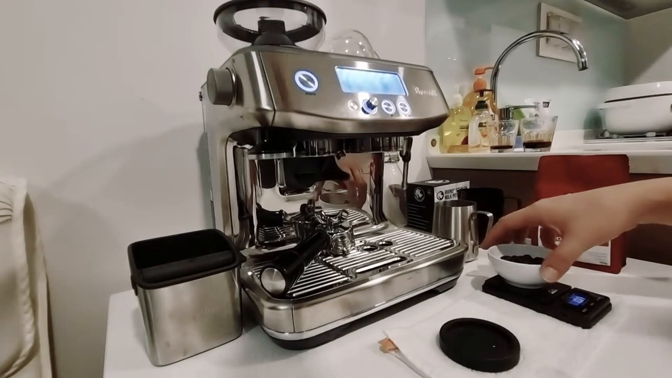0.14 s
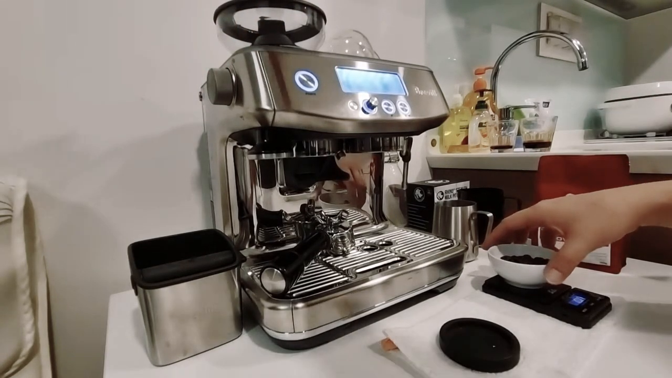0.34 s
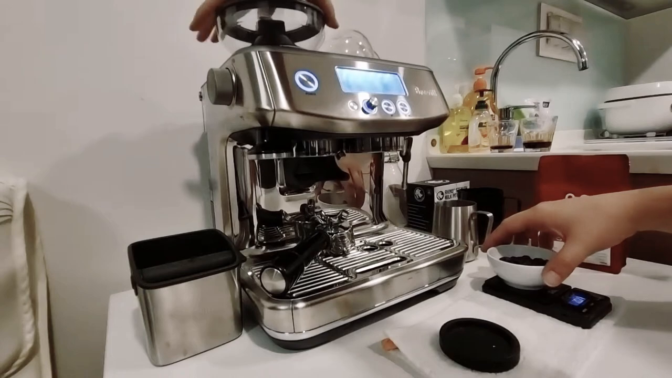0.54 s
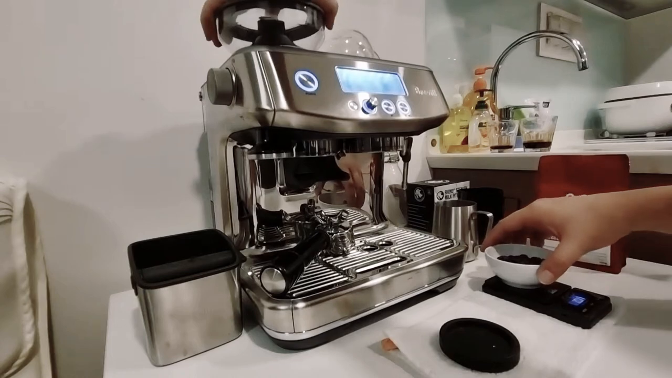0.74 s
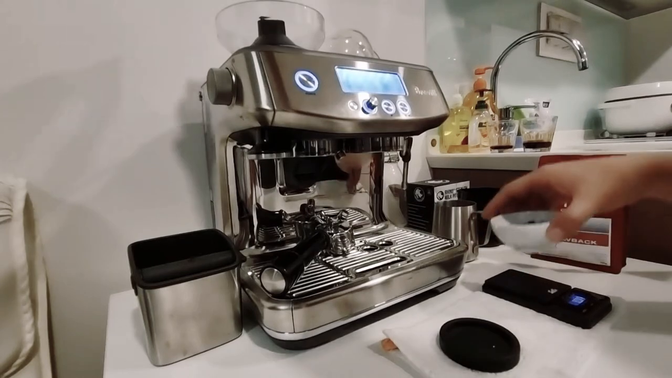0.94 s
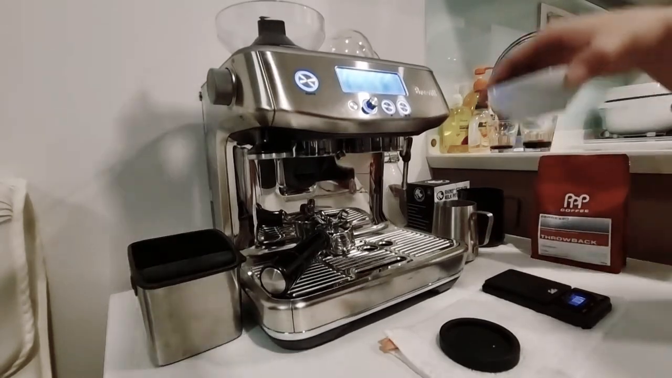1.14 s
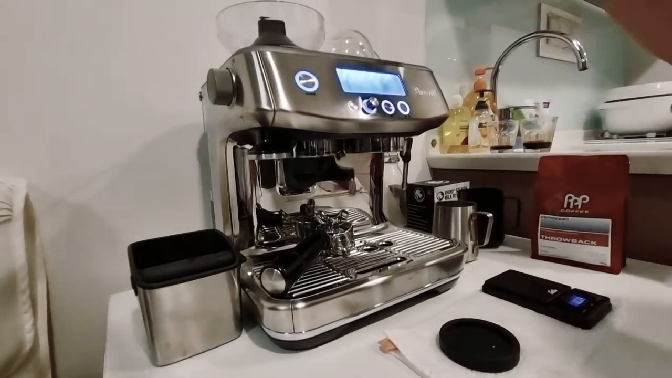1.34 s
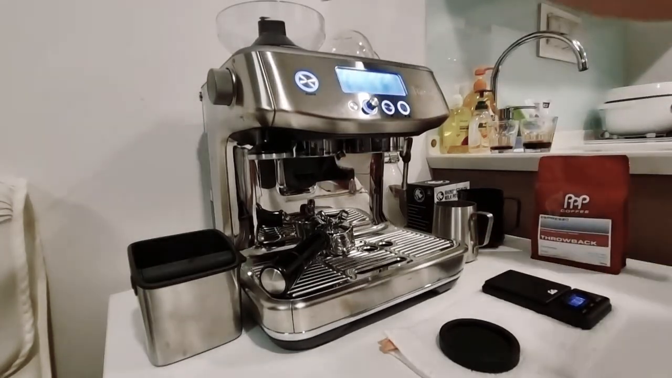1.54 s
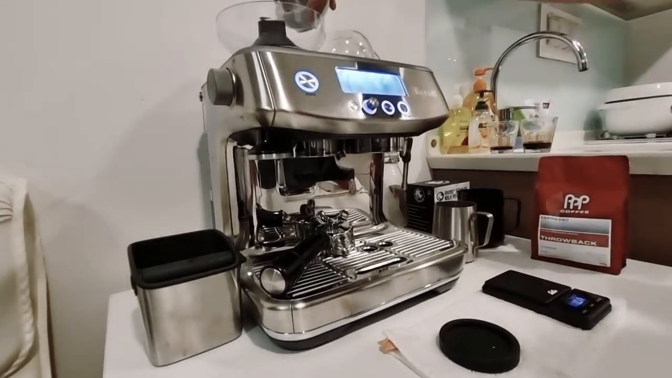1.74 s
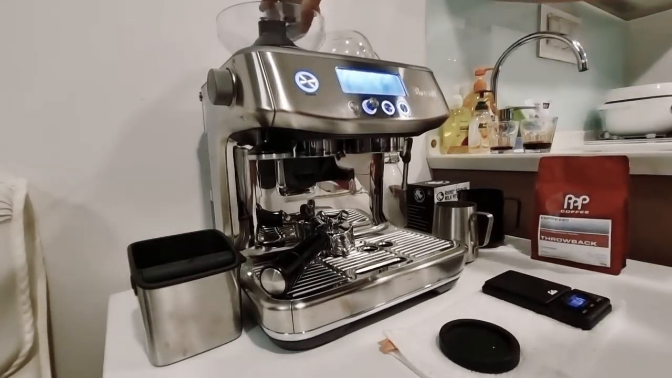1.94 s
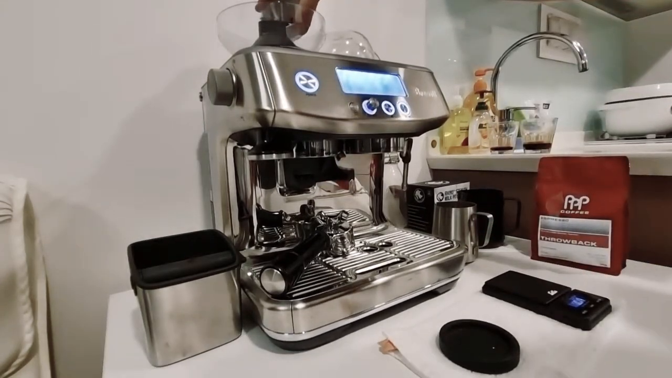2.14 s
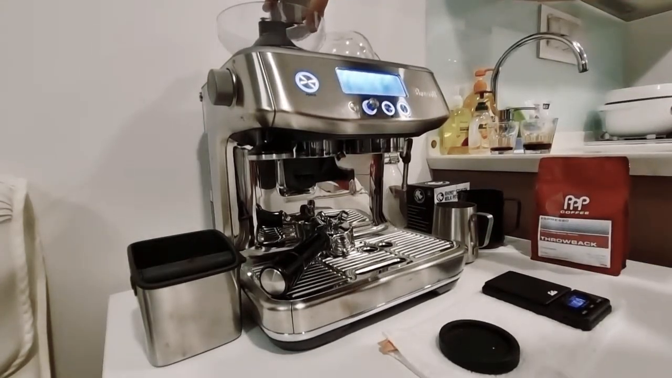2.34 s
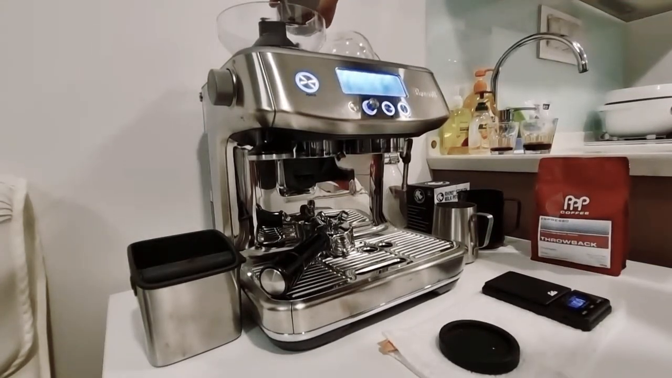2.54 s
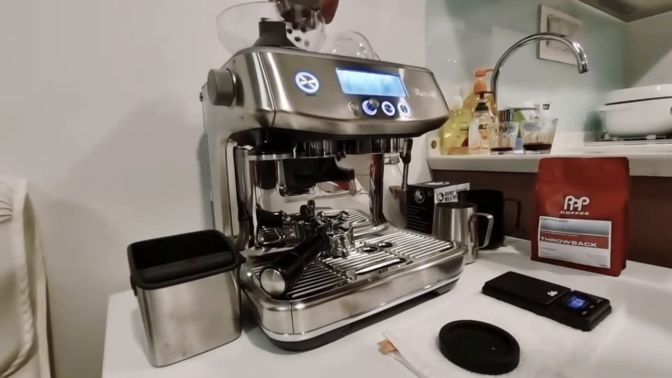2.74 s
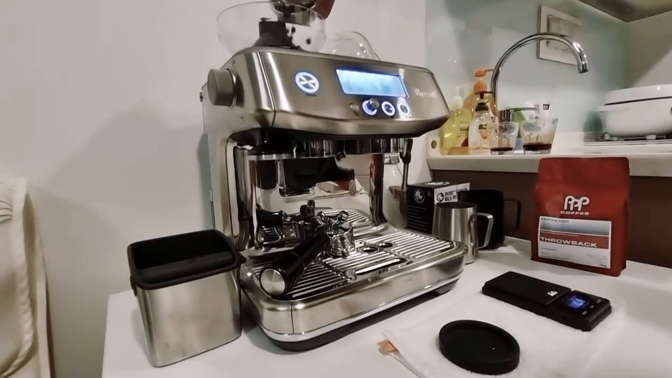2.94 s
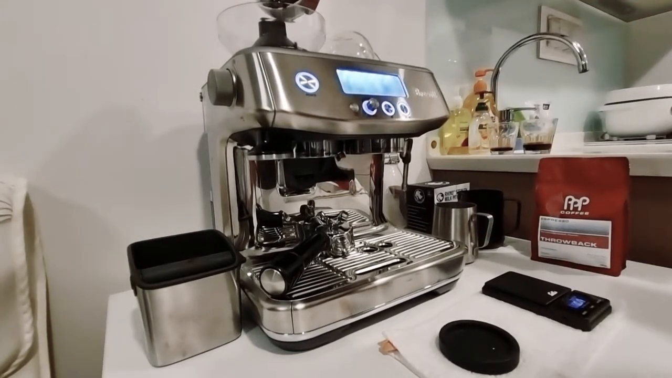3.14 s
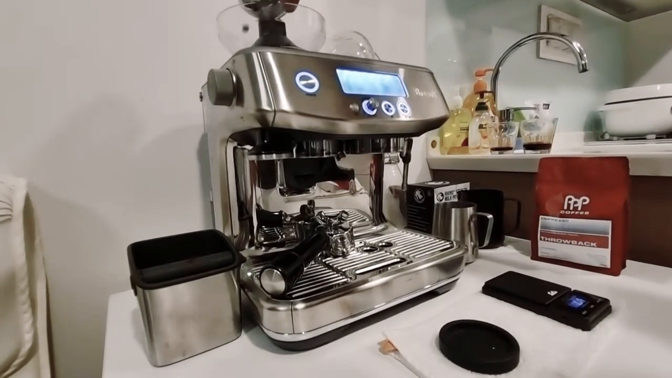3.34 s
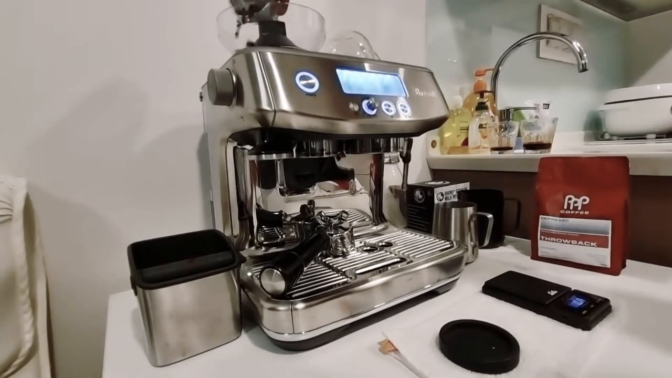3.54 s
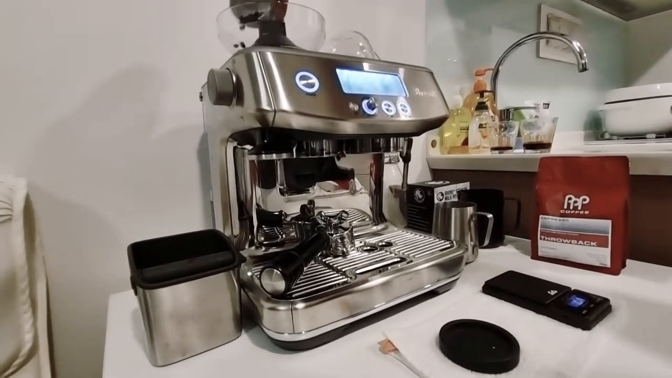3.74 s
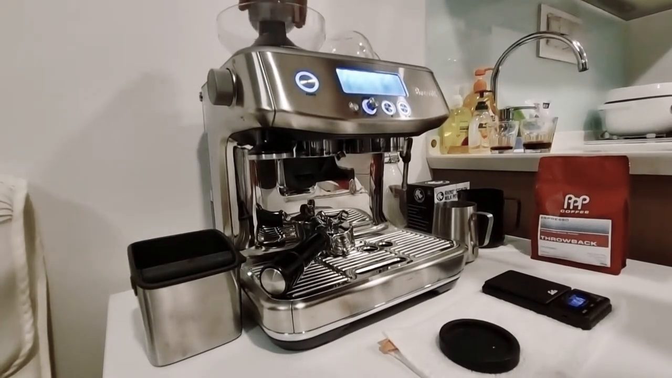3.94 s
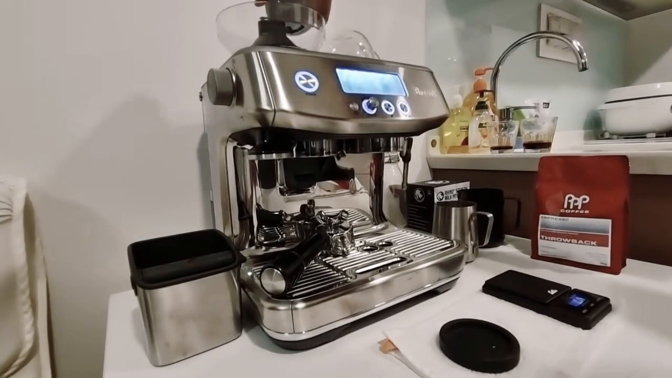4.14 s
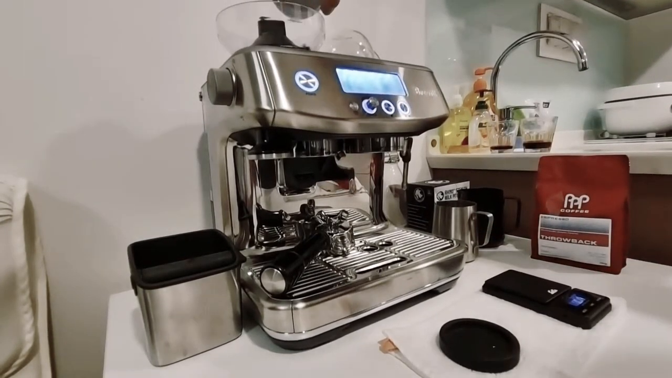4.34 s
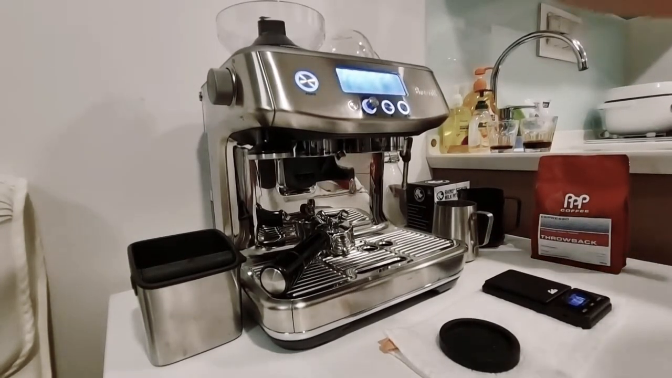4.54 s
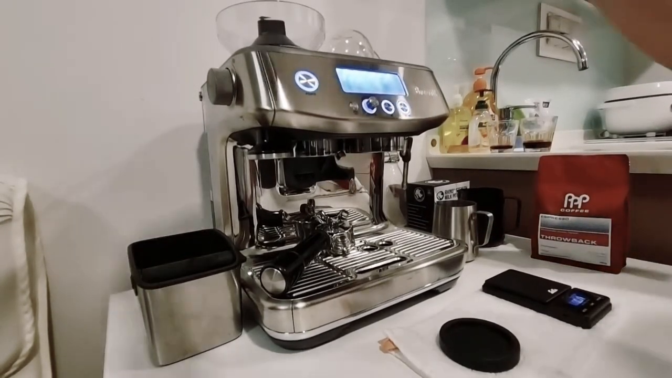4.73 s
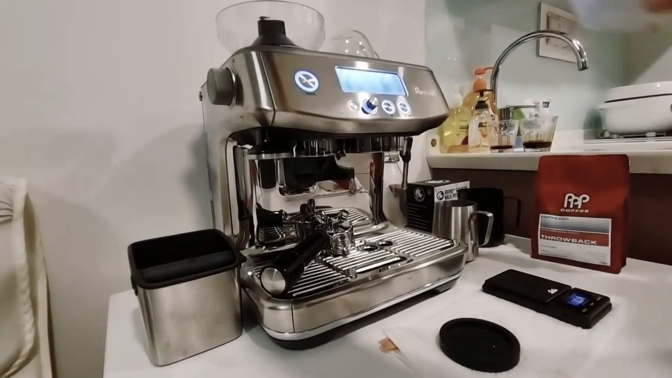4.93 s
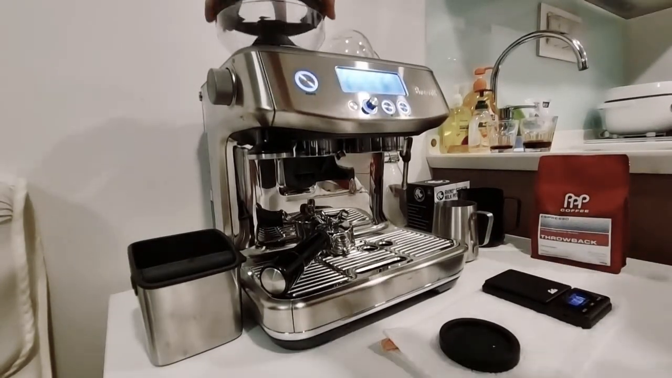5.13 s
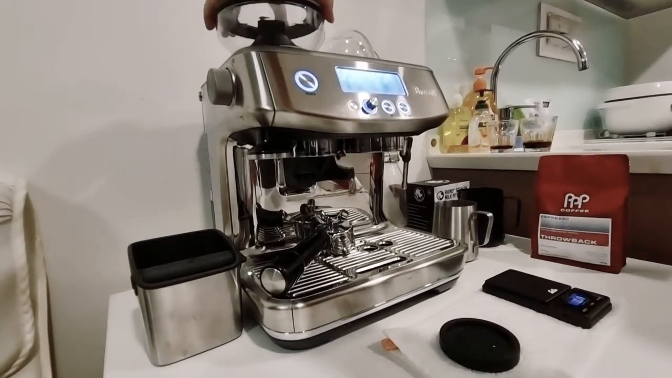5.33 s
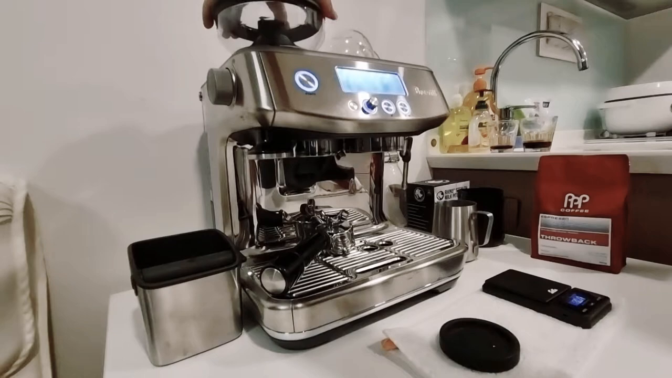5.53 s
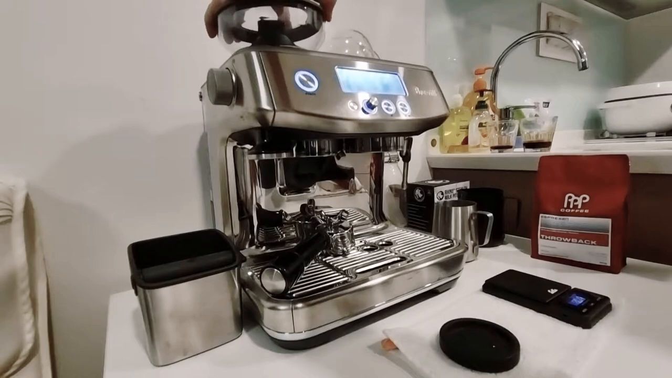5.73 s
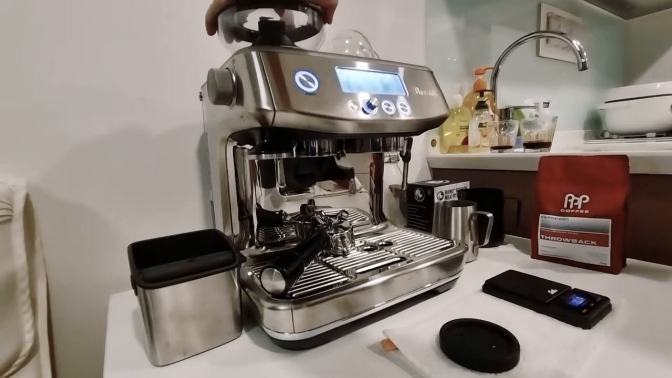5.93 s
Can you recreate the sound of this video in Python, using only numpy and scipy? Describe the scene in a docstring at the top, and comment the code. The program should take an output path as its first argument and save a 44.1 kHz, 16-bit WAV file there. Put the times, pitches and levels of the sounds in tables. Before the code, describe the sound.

Close stereo sound of filling a coffee grinder: soft hollow plastic knocks as the lid lifts, about a second of near silence, a light double tap of the cup, then sharp hailing clicks of beans striking plastic walls in uneven waves for over two seconds. A few stray beans tick, then the lid clatters and is seated. Faint ventilation rumble stays underneath in a small room.

```python
"""Coffee beans pour from a cup into a grinder hopper, in surges of hard clicks that ring its walls.
The stream is a random train of impacts, each a sum of damped modes and decaying noise, following the flow.
Before it the plastic lid is lifted off and the cup knocks on the rim, both as modes with noise bursts;
after it the last beans trickle down and the lid is put back and seated.
Two microphone ports a short way off hear it all over a faint room hum of steady coloured noise."""
import sys
import numpy as np
from scipy import signal
from scipy.fft import rfft, irfft, next_fast_len
from scipy.io import wavfile
from scipy.ndimage import uniform_filter1d

SR = 44100
rng = np.random.default_rng(int(sys.argv[2]) if len(sys.argv) > 2 else 0)


def persist_wave(psi):
    """Save psi, clipped to +-1, as 16-bit WAV."""
    counts = np.round(np.clip(psi, -1, 1) * 32767).astype(np.int16)
    wavfile.write(sys.argv[1], SR, np.atleast_2d(counts).T)


N = 263718
T = np.arange(SR // 4) / SR  # time since a blow, s

# surges of beans, one for each tip of the cup; wall_db is the low ring of the hopper wall:
# full_flow_s, hold_s, level_db, fall_db_per_s, wall_db
SURGES = [(2.087, 0.037, -38, 300, -1), (2.134, 0.018, -25, 339, -8.5), (2.242, 0.29, -26, 63, 4.5),
          (2.69, 0.017, -26, 239, 1), (2.822, 0.011, -34, 199.5, 4.5), (2.899, 0.36, -24.5, 67, 4),
          (3.448, 0.1, -24, 110.5, 4), (3.657, .16, -25, 84.5, 3.5), (3.993, 0.2, -25, 65.5, 4),
          (4.38, 0.077, -27.5, 101, 0.5), (4.795, .03, -56.5, 307, 1)]
# hardest single landings, before LANDING_TRIM_DB: start_s, level_db
HARD_BEANS = [(2.1261, -15.5), (2.1556, -11.5), (2.235, -18.5), (2.256, -21.5), (2.3701, -12.5),
              (2.7002, -14.5), (2.875, -17), (3.0223, -19.5), (3.0714, -11.5), (3.1254, -9),
              (3.1545, -12.5), (3.3931, -12.5), (3.458, -15.5), (3.5091, -9.5), (3.561, -13), (3.6681, -13),
              (3.7822, -15), (3.9665, -20), (4.1317, -10), (4.1598, -13), (4.2996, -16.5), (4.336, -16),
              (4.386, -14), (4.4532, -16.5), (4.739, -61), (4.7753, -44.5), (4.798, -36.5)]
# beans that ping against the cup as they leave it: start_s, level_db
PINGS = [(2.0841, -39.5), (2.11, -32.5), (3.937, -36.5), (3.987, -28.5), (4.027, -32.5)]
# dull bumps of the hopper under the stream: start_s, pitch_hz, level_db
BUMPS = [(3.106, 178, -50), (3.106, 840, -37), (3.792, 526.4, -35), (3.793, 670, -36), (4.095, 530, -41.5)]
# contacts of the cup with the rim, before a common gain: start_s, level_db
CUP_KNOCKS = [(1.9607, -28), (1.9679, -28.5)]
# knocks of the lid against the hopper; hardness runs from cushioned (0) to a bare edge (1):
# start_s, level_db, hardness
LID_KNOCKS = [(0.606, -35, .62), (0.6746, -34, 0.05), (0.7215, -46.5, 0.91), (0.7837, -45, 0.99),
              (0.9149, -38.5, 0.5), (0.9795, -69, 1), (5.2836, -33.5, 0.7), (5.293, -27.5, 0.69),
              (5.362, -37, 0.04), (5.4196, -47.5, 0.83), (5.4401, -34.5, 0.81), (5.4678, -32.5, 0.89),
              (5.4948, -38, 0.73), (5.601, -43, 0.79), (5.7462, -40.5, 0.2), (5.8129, -44, 0.1),
              (5.8489, -40.5, 0.38), (5.9021, -36, 0), (5.9218, -43, .1), (5.9468, -41, 0.05)]

# modes, with levels relative within each body: pitch_hz, level_db, t60_s
HOPPER_MODES = [(505, -20.5, 0.076), (975.5, -8.5, 0.098), (1052, -23.5, .05), (1330, -25, 0.11),
                (1593, -9, 0.036), (2074, -7, 0.048), (2820, 6.5, 0.063), (2898, 3, 0.13),
                (3200, -7.5, 0.19), (4383, 3, 0.086), (4943, 4, 0.053), (5456, -4.5, 0.16),
                (6210, -2.5, 0.068), (6680, -4, .04), (6790, -0.5, 0.069), (7600, 2.5, 0.046),
                (8170, -15, .06), (9450, -10, .06), (13000, -19, .04)]
# high modes of the cup: pitch_hz, level_db, t60_s
PING_MODES = [(6880, -2.5, 0.11), (7680, -2.5, 0.044), (8400, -0.5, 0.12)]
# modes of the cup against the rim: pitch_hz, level_db, t60_s
CUP_MODES = [(218.7, -9.5, 0.164), (270, -0.5, 0.079), (495, -4.5, 0.3), (840, -7, .2), (1296, 5, 0.15),
             (1745, 3.5, 0.18), (1785, 8, 0.09), (1852, 16.5, 0.014), (2130, -6, .13), (2977, -11, 0.52),
             (3030, 6.5, 0.079), (3520, -6, 0.26), (4440, -11, 0.1)]
# modes of the lid and of the hollow under it: pitch_hz, level_db, t60_s
LID_MODES = [(1075, 7.5, 0.052), (1224, 15.5, 0.039), (1340, 7.5, 0.037), (1557, -1.5, 0.22),
             (1646, 8.5, 0.047), (1887, 0.5, 0.051)]
# lower modes of the hollow: pitch_hz, level_db, t60_s
HOLLOW_MODES = [(409.3, -3.5, 0.16), (512, 6.5, 0.079), (633, 3, 0.072), (844, 0, 0.12)]

# relative noise spectrum of a bean's shell: frequency_hz, density_db_per_hz
SHELL = [(100, -23), (250, -20), (600, -22), (1200, -13.5), (2300, -12), (3000, -1.5), (4500, -2.5),
         (7700, 0.5), (9200, -7.5), (12500, -3), (15800, -6.5)]
# the same for struck plastic: frequency_hz, density_db_per_hz
PLASTIC = [(200, -22.5), (500, 5.5), (1200, 0.5), (1800, -2.5), (2400, -16.5), (4000, -26), (8000, -69.5),
           (16000, -63)]
# the same for the tick of a hard edge: frequency_hz, density_db_per_hz
TICK = [(1000, -17.5), (2500, 11), (4000, 5), (7000, -4.5), (10000, -12.5), (16000, -14.5)]
# the same for a low thud: frequency_hz, density_db_per_hz
THUD = [(40, -7), (90, -1.5), (220, -2), (400, -9), (800, -28), (3000, -67)]
# the same for the room hum: frequency_hz, density_db_per_hz
HUM = [(18, -26), (30, 3.5), (79, -3.5), (118, -16.5), (199, -11), (404, -16), (437, -24), (569, -16),
       (666, -26), (1130, -21), (2120, -44), (16000, -63.5)]
# the two microphone ports: frequency_hz, side_minus_mid_db, left_minus_right_db
PORTS = [(106.6, -12.5, -3), (209, -11.5, -2.5), (380, 0.5, -8), (701, 2.5, 0.5), (1264, 2, -2.5),
         (2360, 3, 0.5), (4400, 2, -3.5), (8930, -0.5, -0.5)]

SURGE_RISE_DB_PER_S = 420.5
# the flow weakens as beans jam at the lip of the cup just before each hard landing
JAM_S, JAM_DB = 0.026, -2
# treble gain rises as beans land on a growing heap
BARE_TREBLE_DB, HEAP_TREBLE_DB, HEAP_S = 0.5, 3, 1.5
# below a weak flow the beans only roll, which is dull and hollow
ROLLING_BELOW_DB, ROLLING_DULL_DB_PER_DB = -33.5, 0.4
# low wall ring gains this much for each dB that the flow lies below full
FULL_FLOW_DB, WALL_DB_PER_DB = -28.5, 0.3781
# stray beans, relative to the flow before the trim shared with the hard landings
STRAYS_PER_S, STRAY_DB, LANDING_TRIM_DB = 4.2, 4.5, -10
# a lid contact rebounds once; its strength is hardness times this gain
REBOUND_S, REBOUND_DB = 0.0105, -2
# gain of each part of a lid knock: (cushioned, bare edge)
TICK_DB, HOLLOW_DB, THUD_DB = (-46, -5.5), (-9, -2), (-21, -9)
ROOM_T60_LOW_S, ROOM_T60_HIGH_S = 0.32, 0.24
HUM_DB = -61.5
TOP_HZ = 15750


def stream(per_second=430, scatter_db=5, count=24):
    """Random superposition of impacts: sizes follow the flow, and the place hit wanders round the hopper."""
    t = np.arange(N) / SR
    start, end = SURGES[0][0] - 0.003, SURGES[-1][0] + 0.1
    flow_db = np.interp(t, t[::32], flow(t[::32]))

    heap_db = np.interp(t, [start, start + HEAP_S], [BARE_TREBLE_DB, HEAP_TREBLE_DB])
    treble_db = heap_db - ROLLING_DULL_DB_PER_DB * np.maximum(ROLLING_BELOW_DB - flow_db, 0)
    # each surge keeps its wall ring through its hold
    wall_points = [(s + lag, wall) for s, hold, _, _, wall in SURGES for lag in (0, hold)]
    wall_db = np.interp(t, *np.transpose(wall_points))
    wall_db = wall_db + WALL_DB_PER_DB * np.clip(FULL_FLOW_DB - flow_db, 0, 30)

    progress, luck, aim = rng.random((int(per_second * (end - start)), 3)).T
    at = ((start + progress * (end - start)) * SR).astype(int)
    size = undb(scatter_db * np.minimum(-np.log(luck), 2.4))
    # beans that land within 1/30 s share the energy of the flow, counted per 10 ms
    crowd = uniform_filter1d(np.bincount(at, size ** 2, N), SR // 30) * SR / 100
    size = size * undb(flow_db[at] - 1.0) / np.sqrt(crowd[at])

    # some spots are bare wall and ring, others are padded by the heap
    bare_db = rng.uniform(-6, 4, count)
    spots = [bean(room_db=-2.5, wall_db=db - 3.5, chatter_s=0.014) for db in bare_db]
    place = (count * (0.8 * progress + 0.2 * aim)).astype(int)
    # beans that only roll hardly set the walls ringing
    rolls = [bean(room_db=-7, wall_db=-7.5, chatter_s=0.012) for _ in range(3)]
    rolling = flow_db[at] < ROLLING_BELOW_DB

    out = np.zeros((2, N))
    for when, gain, k, gentle in zip(t[at], size, place, rolling):
        landing = rolls[k % len(rolls)] if gentle else spots[k]
        add(out, when, gain * landing)
    # beans on beans are bright; beans on the wall add its low ring
    lows = shape(out, lambda f: -20 * np.log10(1 + (f / 2400) ** 8))
    highs = out - shape(out, lambda f: -20 * np.log10(1 + (f / 9000) ** 8))
    return out + lows * (undb(wall_db) - 1) + highs * (undb(treble_db) - 1)


def flow(t):
    """Addition of powers: surges swell, hold and die away in dB, and the total dips whenever beans jam."""
    power = 1e-12
    for s, hold, db, fall, _ in SURGES:
        rise_loss_db = SURGE_RISE_DB_PER_S * np.maximum(s - t, 0)
        fall_loss_db = fall * np.maximum(t - s - hold, 0)
        power = power + undb(db - rise_loss_db - fall_loss_db) ** 2
    jam = np.any([(t > s - JAM_S) & (t < s) for s, _ in HARD_BEANS], axis=0)
    return 10 * np.log10(power) + JAM_DB * jam


def bean(room_db, wall_db, chatter_s):
    """Impact excitation: brief chatter, shell clicks at random pitches and ringing of the loaded walls."""
    pitches_hz = 3200 * 4.3 ** rng.random(3)
    shell = ring([(hz, 0, 0.012) for hz in pitches_hz], scatter_db=3)
    walls = ring(HOPPER_MODES, scatter_db=5.5, detune=0.003)
    click = undb(-2) * shell + burst(SHELL, chatter_s, room_db) + undb(wall_db) * walls
    return unit(click * (1 - fade(0.005)))


def hard_landings():
    """Modal response to single impacts: beans on bare plastic, pings on the cup, low bumps of the hopper."""
    out = np.zeros((2, N))
    for s, db in HARD_BEANS + strays():
        landing = bean(room_db=-1.5, wall_db=-4, chatter_s=0.012)
        add(out, s, undb(db + LANDING_TRIM_DB) * landing)
    for s, db in PINGS:
        ping = undb(-2) * ring(PING_MODES, scatter_db=2.5, detune=0.01)
        ping += undb(-3) * burst(SHELL, t60=0.018, room_db=-5)
        add(out, s, undb(db) * ping)
    for s, hz, db in BUMPS:
        bump = ring([(hz, 0, 0.08), (hz, -4, 0.05)], scatter_db=3)
        add(out, s, undb(db) * bump * (1 - fade(0.0042)))
    return out


def strays():
    """Jittered point process: beans jump the heap at levels tied to the flow; rows of start_s, level_db."""
    start, end = SURGES[1][0], SURGES[-1][0]
    slot = rng.random(int(STRAYS_PER_S * (end - start)))
    times = start + (np.arange(len(slot)) + slot) / STRAYS_PER_S
    return list(zip(times, flow(times) + STRAY_DB))


def cup():
    """Coupled impact: the cup rings on the rim and shakes the machine; yielding plastic dulls the crack."""
    out = np.zeros((2, N))
    for s, db in CUP_KNOCKS:
        crack = burst(TICK, t60=0.033, room_db=0.5)
        crack = shape(crack, lambda f: -10 * np.log10(1 + (f / 5000) ** 2))
        knock = ring(CUP_MODES, scatter_db=1) + undb(-6) * burst(PLASTIC, t60=0.04, room_db=-2)
        knock += undb(-7) * crack
        knock += undb(-18.0) * burst(THUD, t60=0.062, room_db=10)
        add(out, s, undb(db + 2) * knock * (1 - fade(0.004)))
    return out


def lid():
    """Contact stiffness: touches ring lid and hollow; hardness adds tick, counter thud and a rebound."""
    out = np.zeros((2, N))
    for first, level_db, hardness in LID_KNOCKS:
        hardness = np.clip(hardness, 0, 1)
        tick_db, hollow_db, thud_db = (
            soft + hardness * (hard - soft) for soft, hard in (TICK_DB, HOLLOW_DB, THUD_DB))
        contacts = ((first, 1), (first + REBOUND_S, hardness * undb(REBOUND_DB)))
        for s, strength in contacts:
            plate = ring(LID_MODES, scatter_db=5.5, detune=0.011)
            plate += undb(-3.5) * burst(PLASTIC, t60=0.07, room_db=4.0)
            tick = burst(TICK, t60=0.055, room_db=-3.5)
            hollow = ring(HOLLOW_MODES, scatter_db=2.5, detune=0.03)
            thud = burst(THUD, t60=0.055, room_db=10)
            # each part swells at its own rate
            knock = undb(-5.5) * plate * (1 - fade(0.005))
            knock += undb(tick_db) * tick * (1 - fade(0.0027))
            knock += undb(hollow_db) * hollow * (1 - fade(0.024))
            knock += undb(thud_db) * thud * (1 - fade(0.0081))
            add(out, s, strength * undb(level_db) * knock)
    return out


def room_hum():
    """Stationary random noise: steady low ventilation sound with a fixed spectrum."""
    air = noise(HUM, N)
    return air * undb(HUM_DB) / np.std(air.mean(axis=0))


def ring(modes, scatter_db, detune=0):
    """Modal superposition: each blow weights the damped modes anew, and the ports hear them out of step."""
    out = np.zeros((2, len(T)))
    for hz, db, t60 in modes:
        lag = np.arctan(undb(read(PORTS, hz))) * np.array([[1], [-1]])
        blow_hz = hz * (1 + detune * rng.standard_normal())
        phase = 2 * np.pi * (blow_hz * T + rng.random()) + lag
        gain = undb(db + scatter_db * rng.standard_normal())
        out += gain * fade(t60) * np.sin(phase.astype(np.float32))
    return unit(out)


def burst(spectrum, t60, room_db):
    """High modal density: crowded damped modes act as decaying noise, with an echo whose lows stay longer."""
    wash = noise(spectrum, len(T))
    lows = shape(wash, lambda f: -10 * np.log10(1 + (f / 900) ** 4))
    room = lows * fade(ROOM_T60_LOW_S) + (wash - lows) * fade(ROOM_T60_HIGH_S)
    room = room * (1 - fade(0.023))  # the echo builds up
    return unit(unit(wash * fade(t60)) + undb(room_db) * unit(room))


def noise(spectrum, size):
    """Interchannel coherence: mid and side noise give ports alike in the bass and wide above."""
    mid, side = rng.standard_normal((2, size))
    side = shape(side, lambda f: read(PORTS, f))
    return shape(np.array([mid + side, mid - side]), lambda f: read(spectrum, f))


def fade(t60):
    """Exponential decay: the amplitude falls by 60 dB in t60 seconds."""
    return np.exp((-np.log(1000) * T / t60).clip(-60).astype(np.float32))


def unit(x):
    """Energy normalisation: scale a blow to the energy of 10 ms at level 1, averaged over the ports."""
    return x / np.sqrt(np.sum(x ** 2) / 2 / (SR / 100))


def shape(x, db_at):
    """Linear filtering: multiply the spectrum by a gain in dB given as a function of frequency."""
    size = x.shape[-1]
    padded = next_fast_len(size)
    gain = undb(db_at(np.fft.rfftfreq(padded, 1 / SR)))
    return irfft(rfft(x, padded) * gain, padded)[..., :size]


def read(table, hz, axis=1):
    """Logarithmic pitch scale: interpolate one column of a table along log frequency."""
    table = np.array(table, float)
    log_hz = np.log(np.maximum(table[:, 0], 1))
    return np.interp(np.log(np.maximum(hz, 1)), log_hz, table[:, axis])


def undb(db):
    """Decibel law: level in dB to amplitude gain."""
    return 10 ** (np.asarray(db) / 20)


def add(out, s, sound):
    """Linear superposition: mix a sound in at time s."""
    i = int(s * SR)
    out[:, i:i + sound.shape[1]] += sound[:, :N - i]


def scene():
    """Superposition of sources: everything on the counter, in the room."""
    return stream() + hard_landings() + cup() + lid() + room_hum()


def record(dry):
    """Port response: level balance varies with pitch; deep rumble and the very top are cut steeply."""
    heard = shape(dry, lambda f: read(PORTS, f, axis=2) * np.array([[0.5], [-0.5]]))
    heard = signal.sosfilt(signal.butter(4, 35, "high", fs=SR, output="sos"), heard)
    return signal.sosfilt(signal.ellip(10, 0.2, 80, TOP_HZ, fs=SR, output="sos"), heard)


dry = scene()
out = record(dry)
persist_wave(out)
```